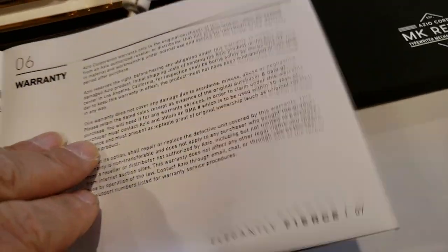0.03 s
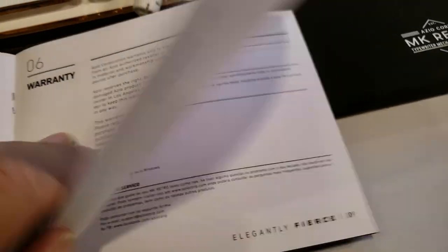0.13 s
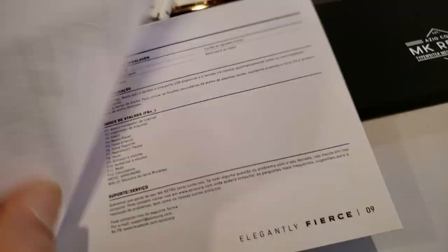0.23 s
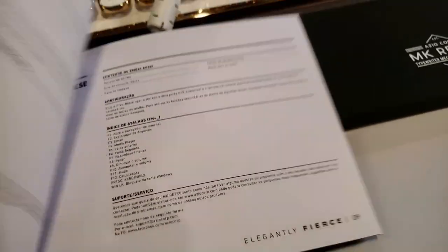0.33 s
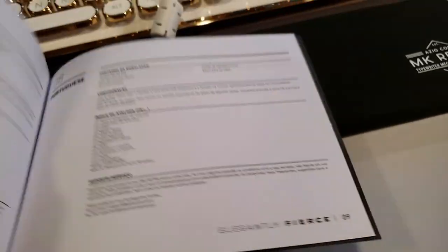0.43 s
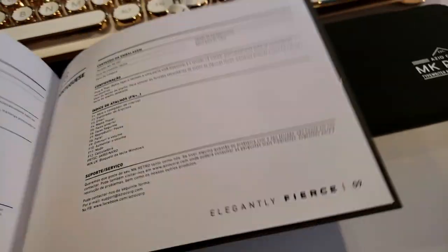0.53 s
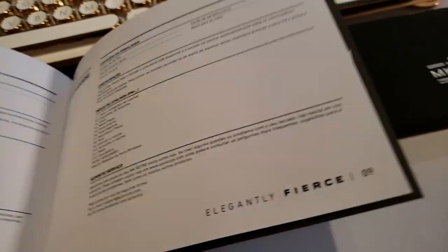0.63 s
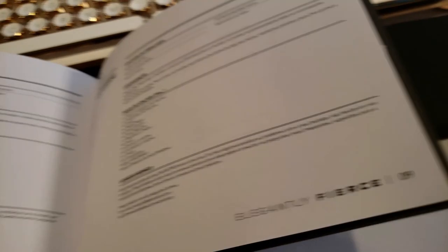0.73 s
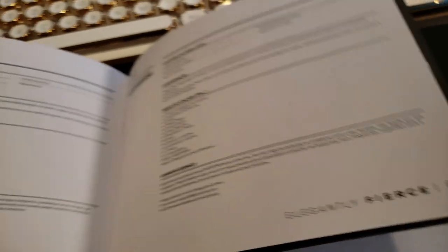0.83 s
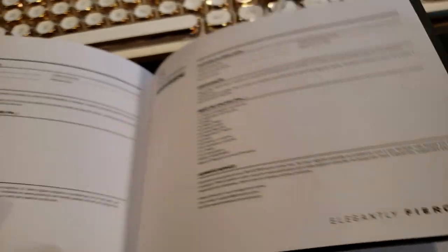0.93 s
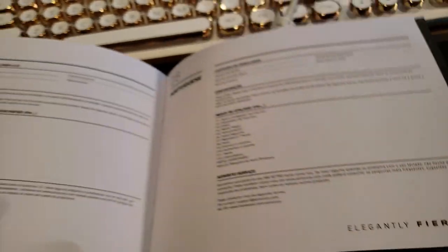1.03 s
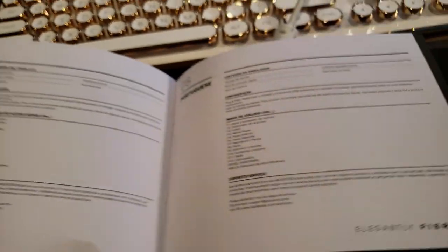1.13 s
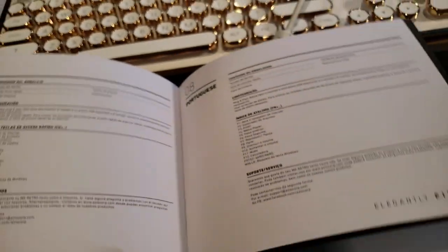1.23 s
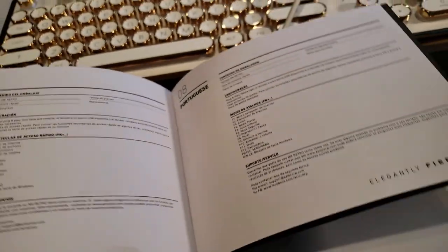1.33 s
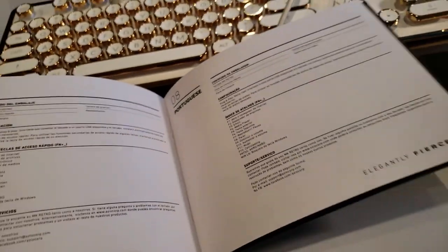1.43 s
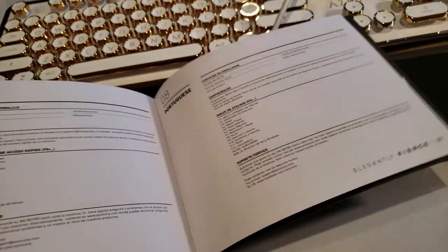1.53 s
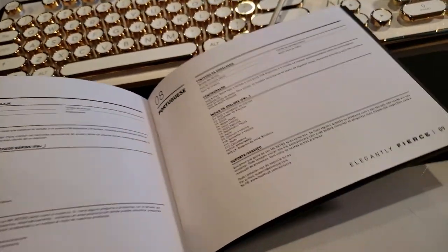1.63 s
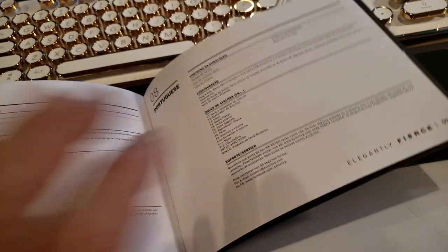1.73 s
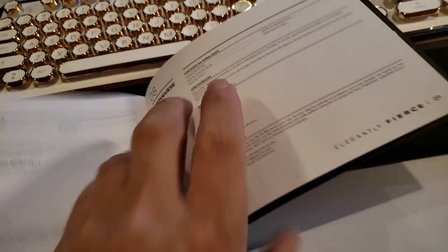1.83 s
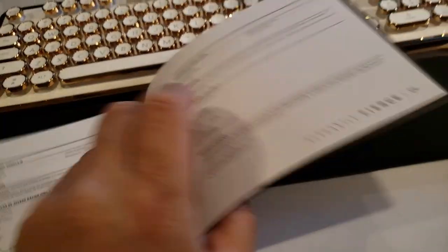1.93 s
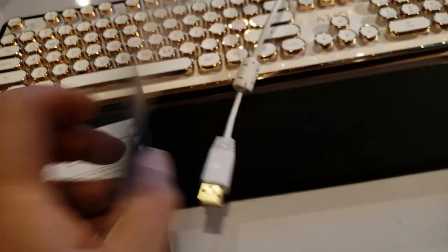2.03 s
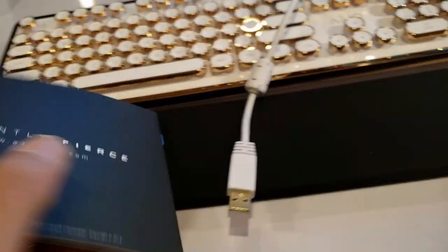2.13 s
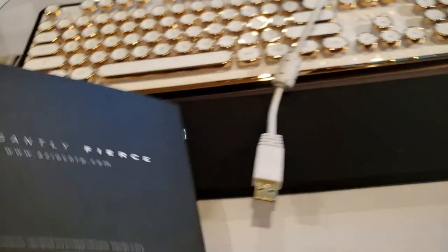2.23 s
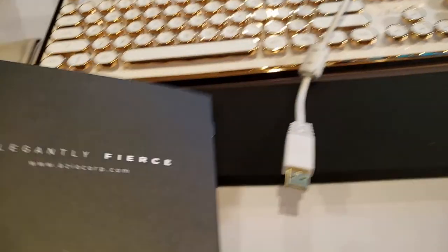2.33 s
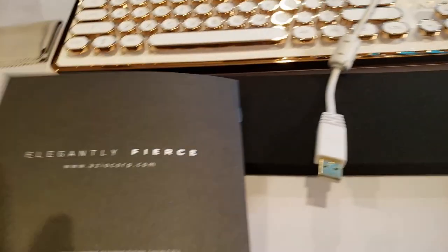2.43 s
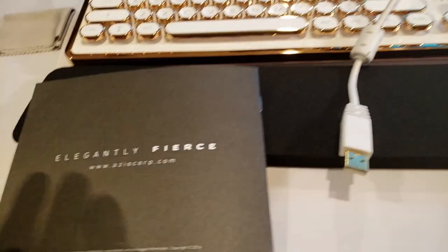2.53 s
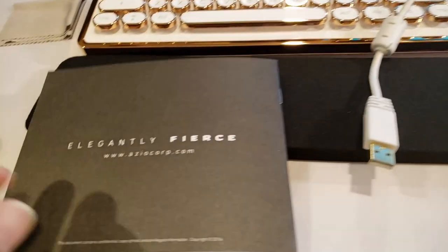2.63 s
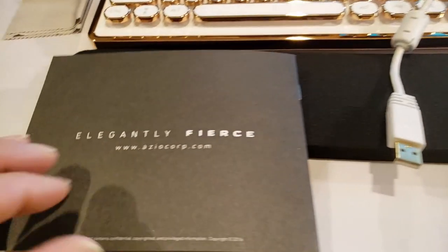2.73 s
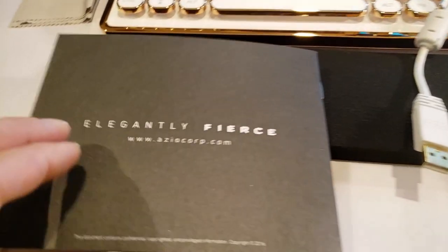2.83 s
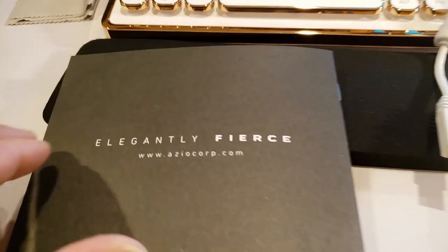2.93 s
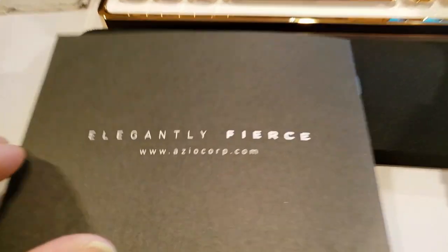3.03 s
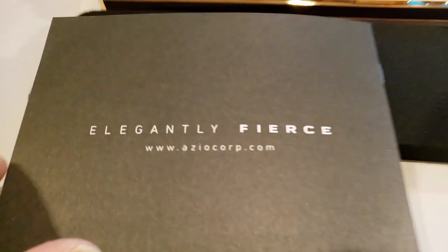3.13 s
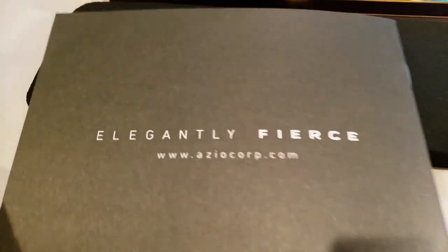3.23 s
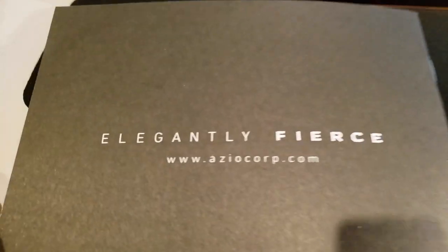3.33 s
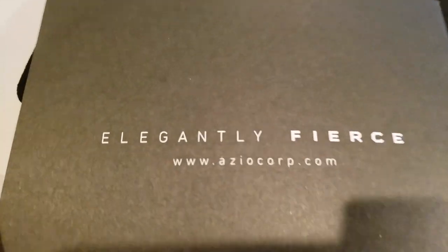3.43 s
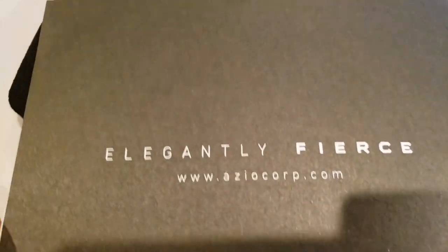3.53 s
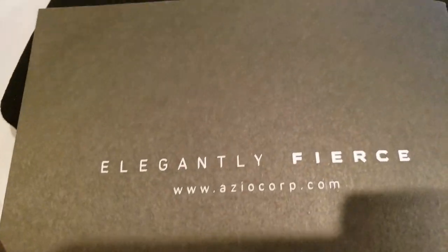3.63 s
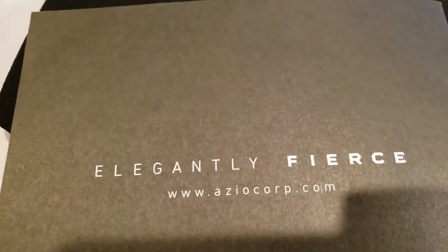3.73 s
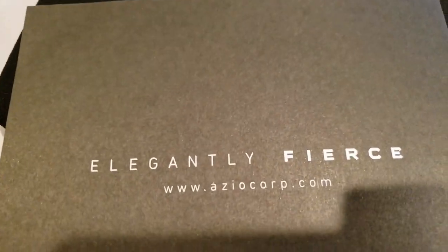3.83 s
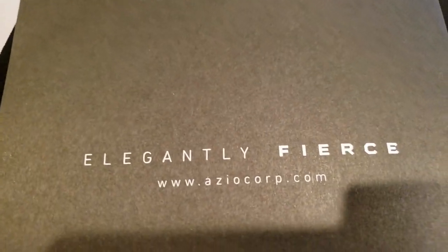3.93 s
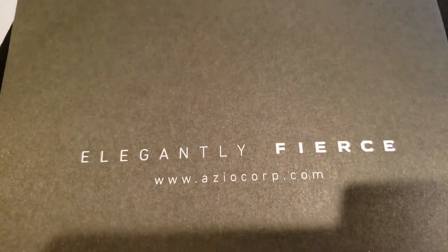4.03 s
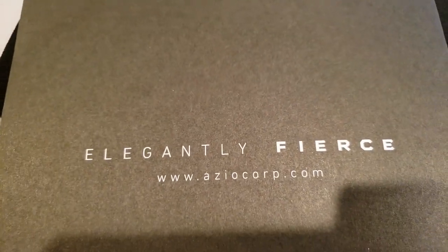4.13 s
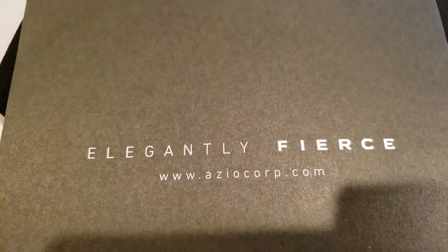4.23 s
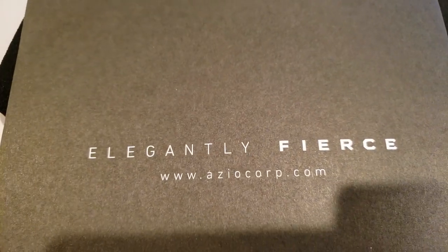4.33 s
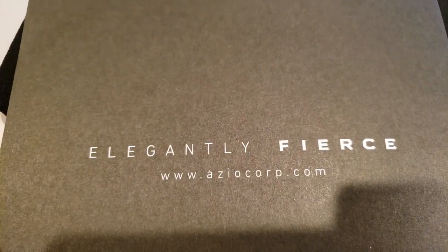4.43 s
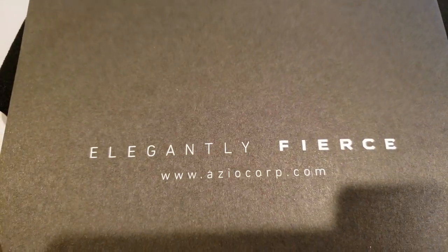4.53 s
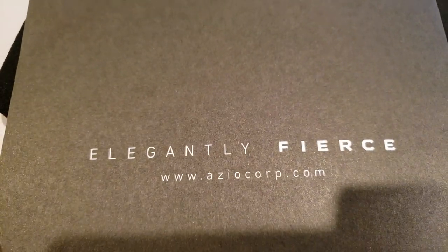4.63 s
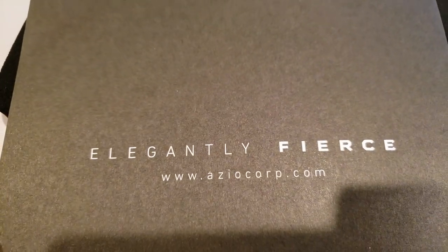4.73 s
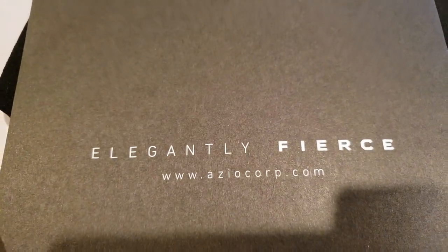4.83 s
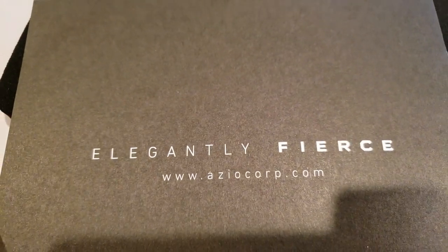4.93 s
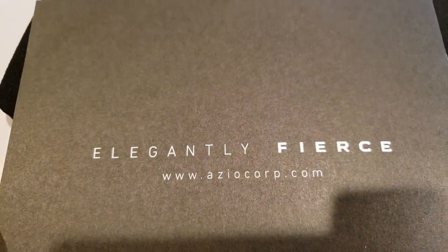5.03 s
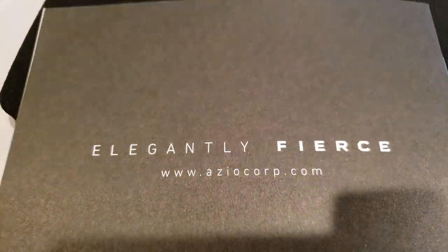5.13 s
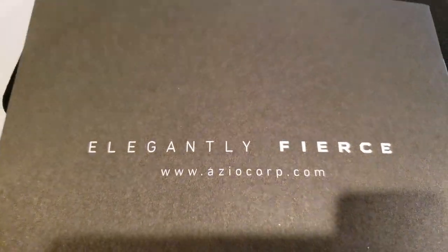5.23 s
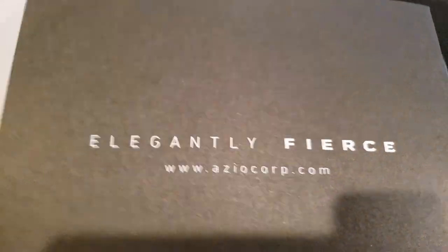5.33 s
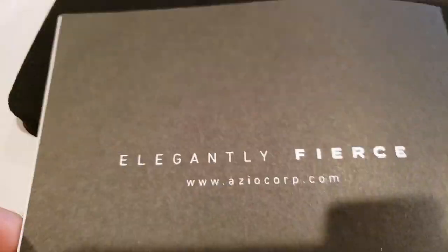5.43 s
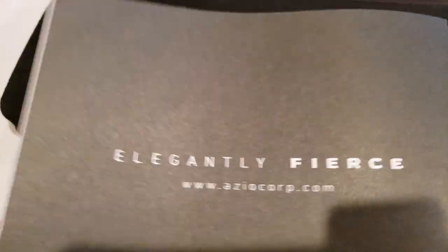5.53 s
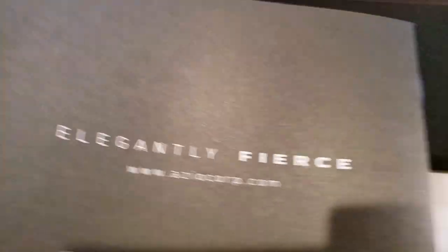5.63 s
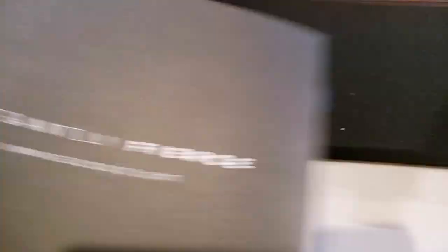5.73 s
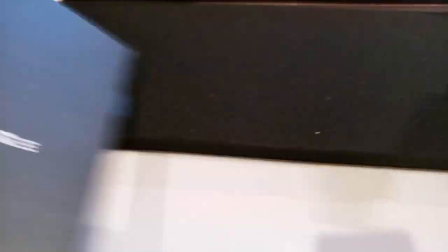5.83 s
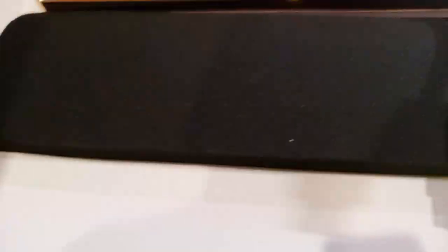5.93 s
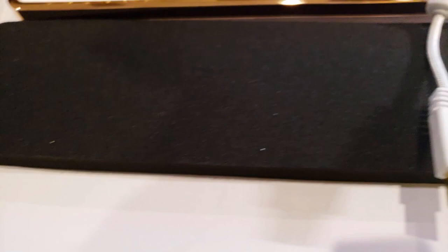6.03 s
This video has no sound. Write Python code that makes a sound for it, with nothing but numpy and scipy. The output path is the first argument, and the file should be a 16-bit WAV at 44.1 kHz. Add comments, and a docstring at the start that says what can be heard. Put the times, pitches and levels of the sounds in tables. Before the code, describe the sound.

In a small quiet room with faint low fan hum, a booklet is leafed busily, snapping and creaking, then softer rubbing. A sudden strong page flap comes about a third of the way in, followed by muted pats on a desk and tiny ticks. A long near-silence ends in dry, hissy paper rustle and one tap. Close microphone, paper leaning left.

```python
"""A quiet room with a desk: a small stiff-paper booklet is leafed, shut and lifted close to a two-port microphone.
Pages buckle with snaps (a pitched click and a rattle), and flap and creak as fibre slips ring the paper's modes.
Sliding fingers hiss as coloured noise, rubs glide in pitch, and pats ring the desk; fans hum faintly behind.
The booklet lies to the left: the left port hears it louder, and its shared sound earlier."""
import sys
import numpy as np
from scipy import signal
from scipy.fft import rfft, irfft, next_fast_len
from scipy.io import wavfile

SR = 44100
rng = np.random.default_rng(int(sys.argv[2]) if len(sys.argv) > 2 else 0)


def bounce(signal):
    """Save signal as a 16-bit WAV file at the path given by the first command-line argument."""
    frames = np.transpose(np.atleast_2d(signal))
    limited = np.clip(frames, -1, 1)
    pcm = np.round(limited * 32767).astype(np.int16)
    wavfile.write(sys.argv[1], SR, pcm)


N = 268657

# The room: noise spectrum [f/Hz, relative level/dB per Hz]
ROOM_SPECTRUM = [(25, -9.5), (55, -2), (68, -7), (95, 0), (180, -3), (300, -2.5), (450, -12.5),
                 (650, -11.5), (780, -18.5), (950, -26), (1300, -29.5), (2200, -31.5), (4200, -32.5),
                 (7200, -36.5), (14000, -36)]
# Likeness of the room noise at the two ports [f/Hz, likeness from -1 to 1]
ROOM_LIKENESS = [(60, 0.69), (240, 0.88), (950, 0.069), (3770, -0.59), (15000, 0.24)]
# Hum lines [f/Hz, pitch wander/Hz, level before the room's swell/dB]
HUM_LINES = [(119.2, 18, -69), (592.5, 4, -76.5)]
# The background dips for a moment and comes back [t/s, level/dB]
ROOM_SWELL_CURVE = [(0, 5), (.5, 2.5), (1.1, -2), (1.5, 3), (2.5, 4)]
# Strokes of the hand on the paper [start t/s, peak t/s, end t/s, start level below peak/dB,
# end level below peak/dB, flapping sheet level/dB, creaking fold level/dB, sliding hiss level/dB]
HAND_STROKES = [(0, .001, 0.065, -1.5, 9, -57, -65.5, -62), (0.068, 0.143, .22, 21, 3.5, -46, -44.5, -47),
                (0.182, 0.238, 0.44, 5, 6.5, -49.5, -48.5, -44),
                (0.456, 0.559, 0.75, 12.5, 10.5, -54, -50, -49),
                (0.765, 0.818, 0.87, 17, 17.5, -41.5, -57, -61.5),
                (1.04, 1.23, 1.4, 15.5, 3.5, -69.5, -68.5, -79.5),
                (1.255, 1.397, 1.5, 8, 5, -64, -65, -69.5), (1.44, 1.475, 1.54, 8, 8.5, -57, -62.5, -85),
                (1.571, 1.631, 1.805, 7, 16.5, -62, -68.5, -71.5),
                (1.921, 1.947, 1.99, 4.5, 23.5, -31, -37, -53.5),
                (1.909, 2.012, 2.095, -0.5, 7.5, -51, -54, -57.5),
                (2.03, 2.127, 2.248, 10, 3, -58.5, -60.5, -52),
                (2.27, 2.343, 2.45, 10, 13.5, -57, -65.5, -57.5), (2.41, 2.462, 2.63, 1, 12, -70, -75, -79),
                (2.92, 2.95, 3, 5, 8, -68.5, -70.5, -72.5), (3.019, 3.035, 3.1, 3, 8, -77, -68, -73.5),
                (3.143, 3.191, 3.216, 12, 10, -58.5, -62, -67), (3.22, 3.258, 3.4, 0, 9, -77, -76, -75),
                (3.57, 3.615, 3.68, 9, 12.5, -72, -79.5, -77),
                (5.08, 5.163, 5.26, 12, 8, -73.5, -80.5, -78), (5.404, 5.454, 5.5, 14, 9, -57, -65, -57.5),
                (5.456, 5.538, 5.7, 7, 5, -59.5, -59, -70),
                (5.549, 5.588, 5.76, 12.5, 4, -55.5, -58.5, -52.5),
                (5.663, 5.72, 5.78, 9.5, 11.5, -55, -54.5, -49.5),
                (5.744, 5.92, 5.99, 6, 12.5, -58, -58, -51),
                (5.992, 6.046, 6.12, 14, 17.5, -55, -49.5, -57.5)]
# Where the hand is [t/s, left-over-right level/dB]
HAND_SIDEWAYS = [(0, 3), (.6, 3.5), (1.0, 4.5), (1.9, 2), (2.4, 3), (3.4, 5.5), (5.4, 4), (6.09, 7.5)]
# Flapping sheet modes [f/Hz, width before broadening/Hz, relative level/dB]
SHEET_MODES = [(840, 450, 10.5), (1260, 216, 13), (1620, 814, 10.5)]
# Creaking fold modes [f/Hz, width before broadening/Hz, relative level/dB]
FOLD_MODES = [(2670, 890, -2), (3640, 640, -2.5), (4130, 700, -3), (5288, 1200, -13)]
# Sliding fingers: hiss spectrum [f/Hz, relative level/dB per Hz]
SLIDE_SPECTRUM = [(2350, -29.5), (4000, -2.5), (5880, -6.5), (6560, -6), (7750, -6), (12100, -8),
                  (15800, -12)]
# Buckling snaps [t/s, click level/dB, click f/Hz, click rise/ms, rattle level relative to click/dB]
BUCKLES = [(.072, -50, 5000, .3, -10), (0.1216, -24, 3520, 0.45, -7), (0.1267, -4.5, 3660, 0.45, -20),
           (0.147, -22, 3170, 0.24, -12), (0.3028, -31, 3180, 0.48, -9.5), (0.5288, -19, 3100, 0.19, -15.5),
           (0.5289, -27.5, 5840, 0.3, -17), (0.5297, -16, 1250, 0.52, -12.5), (0.776, -45.5, 2480, 0.4, -2),
           (0.8, -37.5, 2044, 0.086, -9.5), (.818, -37, 2900, 0.57, -14), (1.447, -19, 1455, 0.54, -27),
           (1.583, -39.5, 1190, 0.21, -17), (1.637, -52, 4500, 0.18, -14.5), (1.904, -34, 4000, 0.2, -13),
           (2.204, -32.5, 2510, 0.4, -13.5), (2.338, -44, 1410, 0.18, -11.5), (2.372, -40.5, 886, 1.3, -18),
           (2.44, -35.5, 1364, 0.9, -20.5), (2.607, -51, 1280, 0.71, -19), (2.913, -51, 1107, 0.26, -13),
           (2.914, -56, 3630, .4, -14), (3.02, -54.5, 3080, 0.21, -12.5), (3.146, -54.5, 2370, 0.28, -14),
           (3.236, -57, 3300, 0.36, -12.5), (3.278, -58, 2510, 0.29, -15), (3.366, -39.5, 11760, 0.35, -26),
           (3.368, -46, 13500, 0.5, -26), (4.24, -65, 3000, 0.36, -15), (5.393, -54.5, 1123, 0.31, -13),
           (5.881, -34, 4360, 0.31, -4)]
# Pats on the desk [t/s, level before mode weighting/dB, f of the touch/Hz]
DESK_PATS = [(.302, -41.5, 700), (.531, -38, 599), (1.449, -37.5, 497), (1.456, -39, 250),
             (1.905, -41, 110), (1.93, -34, 318), (2.206, -31.5, 127), (2.211, -30, 760), (2.233, -45, 835),
             (5.882, -27, 149.8)]
# Desk modes [f/Hz, level before pitch weighting/dB, rise/ms]
DESK_MODES = [(135, 0, 2.6), (208, -2, 1.8), (316, -0.5, 1.96), (561, 0, 1.54), (842, -2, 3)]
# Rubs that sing in the gap between two pages, gliding as the gap changes
# [start t/s, end t/s, level before the fades/dB, first f/Hz, last f/Hz, width/Hz]
PAGE_RUBS = [(.53, .56, -48, 4600, 4400, 400), (0.55, 0.792, -58.5, 4400, 4000, 500),
             (0.563, 0.824, -60.5, 9030, 9000, 900), (1.146, 1.447, -69, 2600, 3600, 600),
             (1.302, 1.423, -70, 6300, 6000, 900), (1.565, 1.719, -66, 3400, 3600, 500),
             (1.915, 1.965, -37.5, 900, 1600, 400), (2.001, 2.197, -54, 5000, 13600, 3000),
             (2.313, 2.397, -54.5, 11400, 11400, 4020), (3.148, 3.219, -65, 2380, 2400, 300),
             (3.161, 3.22, -66, 3400, 3700, 500), (3.358, 3.434, -71, 12000, 11500, 4000),
             (5.41, 5.49, -62.5, 2600, 4600, 900), (5.583, 5.66, -55, 6380, 6600, 600),
             (5.558, 5.66, -56, 5540, 4230, 1100), (5.591, 5.767, -56, 1150, 2400, 800),
             (6.0, 6.082, -57.5, 2500, 2900, 700)]
# The cover's edge meets the desk, a bright tick [t/s, noise level/dB]
EDGE_TICKS = [(2.205, -35.5), (5.881, -40.5)]

ROOM_DB = -63  # before drift and swell
PORT_LAG_MS = 0.3
PAPER_ALIKE = 0.29  # share of crackle power common to both ports
TOUCH_S, RELEASE_S = 0.01, 0.047  # stroke onset and dying away
RATTLE_T60_S = 0.058
DESK_DB_PER_OCTAVE = 6  # modes far from the pitch of the touch sound less
RUB_SLIPS_PER_S, RUB_SPREAD_DB = 3000, 2.5
ROOM_T60_S, WALL_CUT_HZ, ECHO_DB = 0.2, 3300, -12
CUTOFF_HZ = 15830


def from_db(db):
    """Decibels to gain."""
    return 10 ** (np.asarray(db) / 20)


def rms_one(x):
    """Scale to rms 1."""
    return x / np.sqrt(np.mean(x ** 2) + 1e-20)


def in_time(curve):
    """Read a level curve at every sample."""
    times, levels = np.transpose(curve)
    return np.interp(np.arange(N) / SR, times, levels)


def at_hz(points, hz):
    """Read a spectrum on a log frequency axis."""
    points_hz, values = np.transpose(points)
    return np.interp(np.log(hz), np.log(points_hz), values)


def drift(rate_hz):
    """Slow random wandering of rms 1: noise through two equal low-pass poles."""
    step = 40  # samples between computed points
    pole = np.exp(-2 * np.pi * rate_hz * step / SR)
    noise = rng.standard_normal(N // step + 2002)
    slow = signal.lfilter([1], [1, -2 * pole, pole ** 2], noise)[2000:]  # drop the settling
    return np.interp(np.arange(N) / step, np.arange(len(slow)), rms_one(slow))


def resonance(x, hz, width_hz):
    """Two-pole band-pass with gain near 1 on top."""
    r = np.exp(-np.pi * width_hz / SR)
    edge = (1 - r * r) / 2
    return signal.lfilter([edge, 0, -edge], [1, -2 * r * np.cos(2 * np.pi * hz / SR), r * r], x)


def broad_mode(x, hz, width_hz):
    """The same resonance twice, for steeper skirts."""
    return resonance(resonance(x, hz, width_hz), hz, width_hz)


def coloured_noise(spectrum, alike_at):
    """Stereo noise with a level and a left-right likeness for each pitch; rms 1."""
    size = next_fast_len(N)
    hz = np.maximum(np.arange(size // 2 + 1) * SR / size, 1)
    mid, side = rfft(rng.standard_normal((2, size))) * from_db(at_hz(spectrum, hz))
    alike = np.clip(at_hz(alike_at, hz), -1, 1)
    both = np.sqrt(1 + alike) * mid + np.sqrt(1 - alike) * side * [[1], [-1]]
    return rms_one(irfft(both, size)[:, :N])


def slip_train(shape, per_s, spread_db):
    """Random slips: sparse impulses of uneven size and either sign."""
    sizes = from_db(spread_db * np.minimum(rng.exponential(1, shape), 4))
    signs = rng.choice([-1, 1], shape)
    return sizes * signs * (rng.random(shape) < per_s / SR)


def ports(direct, scattered, pan_db):
    """The direct sound reaches the right port late; a scattered part differs in each port."""
    late = np.roll(direct, round(PORT_LAG_MS * SR / 1000))
    left = from_db(pan_db / 2) * (direct + scattered[0])
    right = from_db(-pan_db / 2) * (late + scattered[1])
    return np.array([left, right])


def background():
    """Fan rumble and microphone hiss as coloured noise, with hum lines that waver a little."""
    tone = from_db(ROOM_DB + 0.28 * drift(5.4)) * coloured_noise(ROOM_SPECTRUM, ROOM_LIKENESS)
    for hz, wander_hz, db in HUM_LINES:
        turns = np.cumsum(hz + wander_hz / 2 * drift(2.7)) / SR + rng.random()
        tone = tone + from_db(db + 1.7 * drift(4.1)) * np.sqrt(2) * np.sin(2 * np.pi * turns)
    return from_db(in_time(ROOM_SWELL_CURVE)) * tone


def strokes():
    """Gains of sheet, fold and slide: each stroke sets in, passes its peak, fades and is let go."""
    t, power = np.arange(N) / SR, np.zeros((3, N))
    for start, peak, end, swell_db, fade_db, *layers_db in HAND_STROKES:
        times = np.maximum.accumulate([start - TOUCH_S, start, peak, end, end + RELEASE_S])
        levels_db = [-swell_db - 30, -swell_db, 0, -fade_db, -fade_db - 30]
        shape_db = np.interp(t, times, levels_db, left=-200, right=-200)
        power += from_db(np.add.outer(layers_db, shape_db)) ** 2
    return np.sqrt(power)


def crackle(modes, per_s, spread_db, clump_db, bend_db):
    """Clumped fibre slips ring the paper's broad modes: one train for both ports, one for each."""
    slips = slip_train((3, N), per_s, spread_db) * from_db(clump_db * drift(35)) + 1e-18
    rung = np.zeros((3, N))
    for k, (hz, width_hz, db) in enumerate(modes):
        # as the page bends, each mode swells and fades on its own
        gain = (-1) ** k * from_db(db + bend_db * drift(5.0))
        rung += gain * broad_mode(slips, hz, 1.5 * width_hz)
    rung = rms_one(rung)
    return np.sqrt(PAPER_ALIKE) * rung[0], np.sqrt(1 - PAPER_ALIKE) * rung[1:]


def handling(pan_db):
    """Flapping sheet, creaking fold and sliding hiss follow the hand's strokes."""
    sheet_gain, fold_gain, slide_gain = strokes()
    sheet = ports(*crackle(SHEET_MODES, per_s=2300, spread_db=3.5, clump_db=3.0, bend_db=1.46), pan_db)
    fold = ports(*crackle(FOLD_MODES, per_s=1900, spread_db=3.0, clump_db=2.0, bend_db=1.6), pan_db)
    slide_alike = [(1000, 0.058), (9000, 0.0081)]  # f/Hz, left-right likeness
    hiss = slide_gain * from_db(1.5 * drift(41.6)) * coloured_noise(SLIDE_SPECTRUM, slide_alike)
    return sheet_gain * sheet + fold_gain * fold + ports(np.zeros(N), hiss, pan_db)


def blow(hz, rise_ms, t):
    """A sine whose envelope swells to 1 in the rise time and dies away."""
    swell = t / (rise_ms / 1000)
    return swell * np.exp(1 - swell) * np.sin(2 * np.pi * hz * t)


def snaps(pan_db):
    """A buckle flips with a crack and a short pitched click, then the sheet rattles out."""
    out, t = np.zeros((2, N + SR)), np.arange(SR // 4) / SR
    modes = SHEET_MODES + FOLD_MODES + [(7660, 2600, -9.5), (12490, 4000, -12.5)]
    decay = from_db(-60 * t / RATTLE_T60_S)
    crack = 1 + 1.394 * np.exp(-t / 0.00044)  # the first millisecond or two stands above the tail
    for s, db, click_hz, rise_ms, rattle_db in BUCKLES:
        noise = rng.standard_normal((3, len(t)))
        rattle = np.zeros((3, len(t)))
        for hz, width_hz, level_db in modes:
            # modes near the pitch of the click rattle most
            near_db = level_db - 8.2 * abs(np.log2(hz / click_hz))
            rattle += from_db(near_db) * broad_mode(noise, hz, 2.3 * width_hz)
        rattle = rms_one(rattle) * from_db(rattle_db) * decay * crack
        direct = blow(click_hz, rise_ms, t) + rattle[0]
        at = round(s * SR)
        out[:, at:at + len(t)] += from_db(db) * ports(direct, 1.054 * rattle[1:], pan_db[at])
    return out[:, :N]


def pats(pan_db):
    """A pat rings the desk's modes, most of all those near the pitch of the touch."""
    out, t = np.zeros((2, N + SR)), np.arange(SR // 4) / SR
    for s, db, touch_hz in DESK_PATS:
        thump = np.zeros(len(t))
        for hz, level_db, rise_ms in DESK_MODES:
            near_db = level_db - DESK_DB_PER_OCTAVE * abs(np.log2(hz / touch_hz))
            thump += from_db(near_db) * blow(hz, rise_ms, t)
        at = round(s * SR)
        # the desk carries low thumps more to the left port
        out[:, at:at + len(t)] += from_db(db) * ports(thump, np.zeros((2, len(t))), pan_db[at] + 4.0)
    return out[:, :N]


def rub(length, first_hz, last_hz, width_hz):
    """Uneven slips ring a resonance whose pitch glides; rms 1."""
    turn = np.exp(2j * np.pi * np.cumsum(np.geomspace(first_hz, last_hz, length)) / SR)
    slips = slip_train((2, length), RUB_SLIPS_PER_S, RUB_SPREAD_DB) + 1e-18
    r = np.exp(-np.pi * width_hz / SR)
    # shift the gliding pitch down to 0 Hz, low-pass there, and shift back up
    ringing = turn * signal.lfilter([1], [1, -2 * r, r * r], slips / turn)
    return rms_one(np.real(ringing))


def rubs(pan_db):
    """Pages rubbing on each other sing, each rub fading in and out."""
    out = np.zeros((2, N))
    for start, end, db, first_hz, last_hz, width_hz in PAGE_RUBS:
        a, b = round(start * SR), round(end * SR)
        fade = np.sqrt(np.hanning(b - a))
        out[:, a:b] += from_db(db) * fade * rub(b - a, first_hz, last_hz, width_hz)
    return ports(np.zeros(N), out, pan_db)


def edge_ticks(pan_db):
    """The cover's edge strikes the desk: treble-tilted noise that dies in a few milliseconds."""
    out, t = np.zeros((2, N + SR)), np.arange(SR // 4) / SR
    for s, db in EDGE_TICKS:
        bright = np.diff(rng.standard_normal((2, len(t))), prepend=0)
        tick = bright * np.exp(-t / 0.0026)
        at = round(s * SR)
        out[:, at:at + len(t)] += from_db(db) * ports(np.zeros(len(t)), tick, pan_db[at])
    return out[:, :N]


def walls(x):
    """Echo off the walls: eight feedback delays a side, duller on every round."""
    size = next_fast_len(N + SR)
    turn = np.exp(-2j * np.pi * np.arange(size // 2 + 1) / size)  # one sample of delay
    dull = np.exp(-2 * np.pi * WALL_CUT_HZ / SR)
    damping = (1 - dull) / (1 - dull * turn)
    answer = np.zeros((2, len(turn)), complex)
    lags = (rng.uniform(0.008, 0.03, 16) * SR).astype(int)
    for k, lag in enumerate(lags):
        loop = from_db(-60 * lag / SR / ROOM_T60_S) * damping * np.exp(lag * np.log(turn))
        answer[k % 2] += loop / (1 - loop) * (-1) ** (k // 2)
    return irfft(rfft(x, size) * answer, size)[:, :N]


def scene():
    """Paper and desk, their echo off the walls, and the room."""
    pan_db = in_time(HAND_SIDEWAYS)
    paper = handling(pan_db) + snaps(pan_db) + pats(pan_db) + rubs(pan_db) + edge_ticks(pan_db)
    return paper + from_db(ECHO_DB) * walls(paper.mean(axis=0)) + background()


def record(dry):
    """The microphone loses the deepest bass; the top is cut."""
    thin = signal.sosfilt(signal.butter(2, 40, "high", fs=SR, output="sos"), dry)
    return signal.sosfilt(signal.ellip(12, 0.5, 70, CUTOFF_HZ, fs=SR, output="sos"), thin)


dry = scene()
out = record(dry)
bounce(out)
```